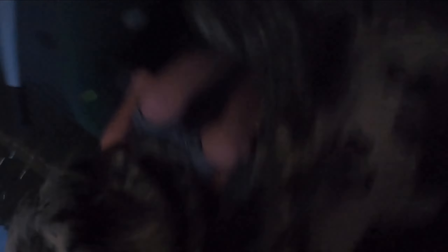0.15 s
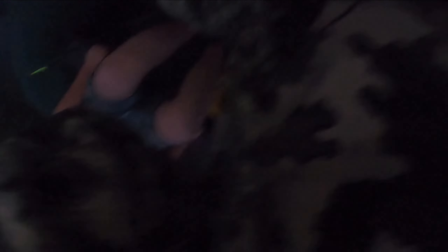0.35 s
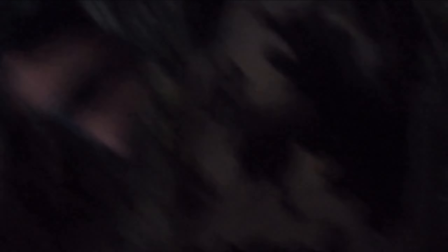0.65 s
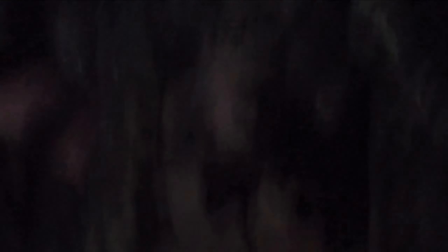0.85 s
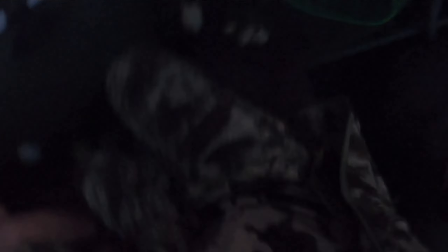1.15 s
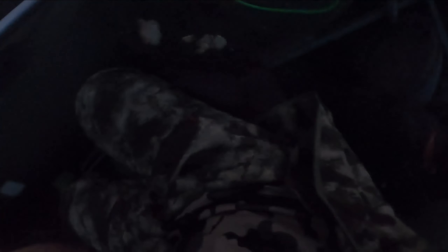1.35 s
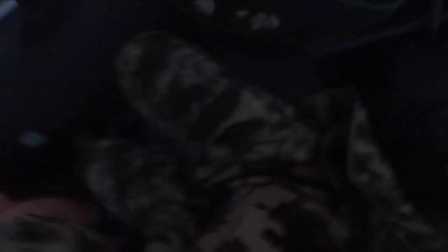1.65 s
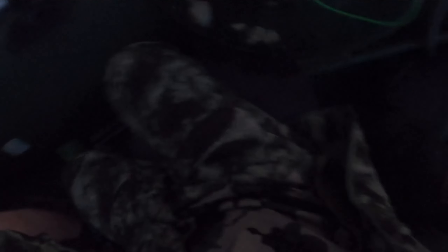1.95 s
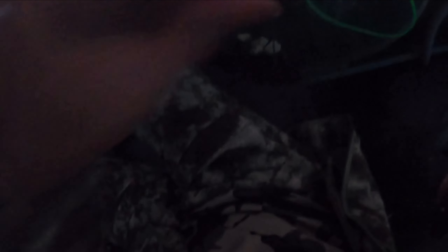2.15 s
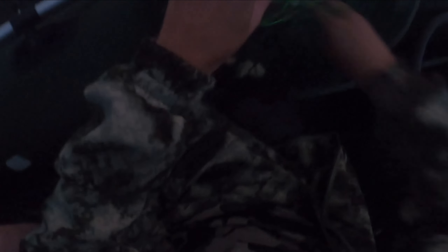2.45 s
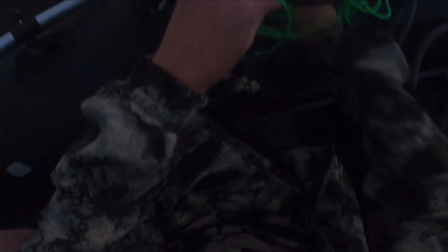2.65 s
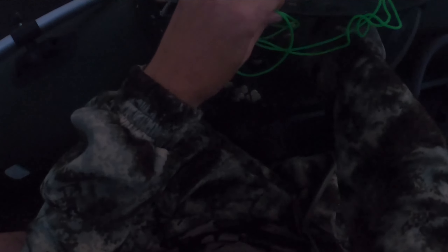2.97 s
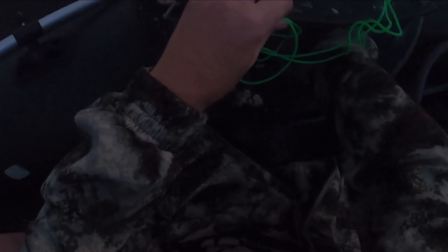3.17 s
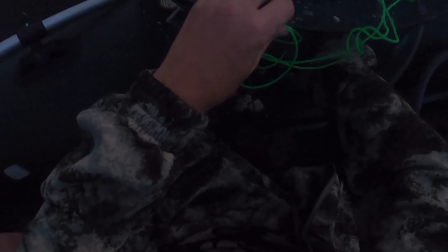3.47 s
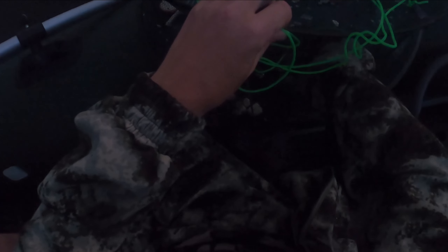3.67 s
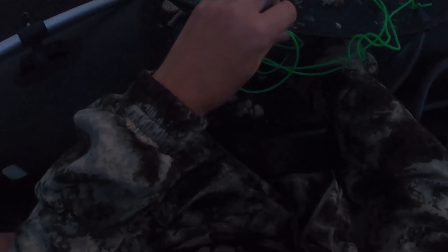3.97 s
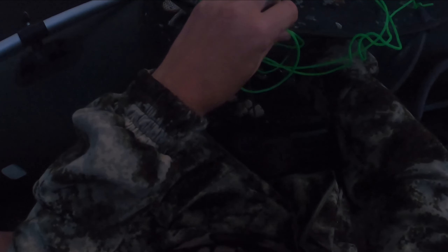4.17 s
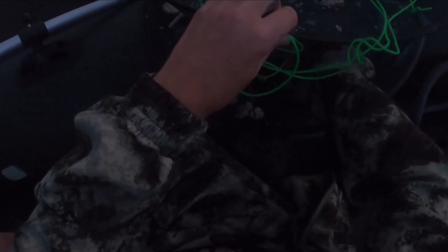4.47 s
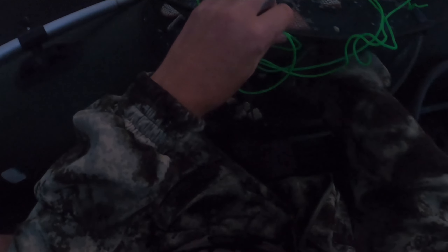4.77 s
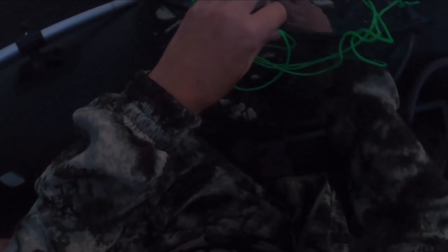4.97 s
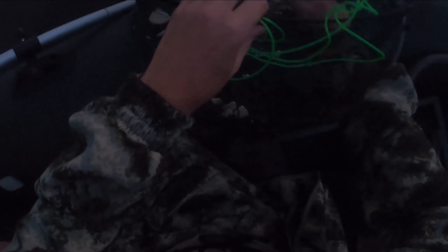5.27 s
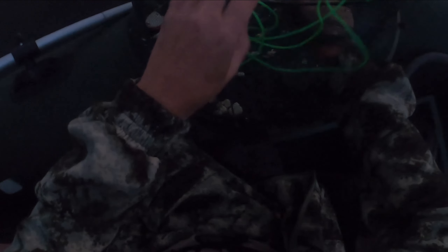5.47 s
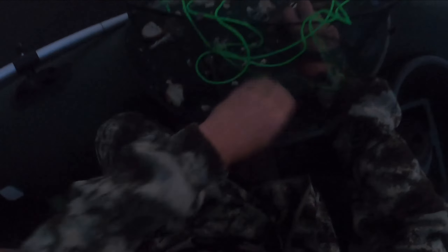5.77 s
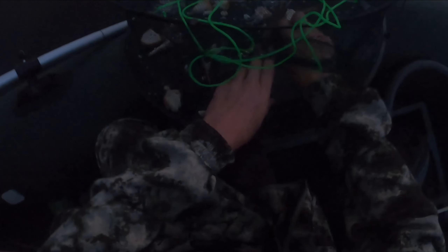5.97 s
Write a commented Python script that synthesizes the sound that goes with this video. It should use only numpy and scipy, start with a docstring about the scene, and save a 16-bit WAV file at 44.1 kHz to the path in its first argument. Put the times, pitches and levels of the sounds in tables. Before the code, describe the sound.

Water plinks and trickles off a wet trap as it bumps a small boat, with one loud thump and soft clothing rustle.

```python
"""A small boat on a still lake: a wet trap comes over the side, close to a worn camera.
The trap knocks and rubs on the hull, and the hardest knock rocks the camera and pings its case.
Drops plink into the lake as ringing air bubbles, the wet mesh ticks, and run-off trickles and fizzes.
A jacket slides with a grainy hiss and body movements shake the microphone, over a hush of open air."""
import sys
import numpy as np
from scipy import signal
from scipy.fft import rfft, irfft
from scipy.io import wavfile
from scipy.ndimage import uniform_filter1d

SR = 44100
rng = np.random.default_rng(int(sys.argv[2]) if len(sys.argv) > 2 else 0)


def bounce(signal):
    """Save signal as a 16-bit WAV file at the path given by the first command-line argument."""
    frames = np.transpose(np.atleast_2d(signal))
    limited = np.clip(frames, -1, 1)
    pcm = np.round(limited * 32767).astype(np.int16)
    wavfile.write(sys.argv[1], SR, pcm)


N = 269753

# Knocks on the hull: start_s, thud_peak_db, spot_pitch_hz, ring_time_ratio, crack_over_thud_db
KNOCKS = [(.052,-36,295,2.45,-22), (.116,-48,161,0.81,13.5), (0.195,-41,283,1.32,-11.5),
          (0.268,-38,227,1.25,-13), (0.603,-47,198,0.59,6), (.625,-35.5,404,1.55,-11),
          (0.6745,-40,200,0.5,6), (.6803,-29,260,.4,-25), (0.717,-47,207,.55,8), (0.8185,-17.5,200,.5,-20),
          (0.8236,-0.3,200,0.6,-23), (.8262,-14,320,1.7,-22), (.933,-35,219,1.28,-13),
          (1.193,-20,230.6,1.1,-11), (1.2028,-25,290,0.6,-16.5), (1.863,-35,239.3,1.48,-15.5),
          (1.898,-35.5,255.3,0.45,-6), (2.047,-42,207,2.27,2), (2.306,-45,300,0.6,4), (2.319,-50,300,.6,7),
          (2.501,-48,330,1.5,7), (2.827,-43.5,230,1.51,4), (2.973,-42,330,1.2,-1),
          (3.194,-43,202.5,2.2,-14), (3.897,-41.5,167,0.415,-4.5), (4.411,-39.5,367,0.78,-1.5),
          (4.8468,-26,375,0.75,-8), (4.881,-36,300,0.44,-13), (4.912,-31,376,0.8,-8),
          (4.928,-31.5,343,0.5,-9), (5.148,-41,306,2.55,7), (5.222,-42,190,1.5,-3),
          (5.281,-29.5,340,0.7,-5), (5.487,-47,263,1.18,5.5), (5.876,-43,215,1.54,-0.5)]
# Resonances of the hull: pitch_hz, level_db, t60_s
HULL_MODES = [(101.9, 3.5, 0.21), (159, 1, 0.1), (188.6, 2.5, 0.084), (227.44, 2.5, 0.0681),
              (306.4, 9.5, 0.047), (353, 0, 0.031), (398, 5.5, 0.056), (495.3, 8, 0.027)]
# Noise bands in the crack of a knock: centre_hz, width_hz, level_db
CRACK_BANDS = [(900, 500, 8), (1450, 700, 10), (2040, 480, 5), (2772, 1000, -2), (3910, 600, -10),
               (6050, 2800, -22.5)]
# The hardest knock rocks the camera: start_s, level_db, pitch_hz, t60_s
CAMERA_WOBBLE = [(.829, -14, 29., .16), (.827, -12, 48, 0.12)]
# The same knock pings the camera case: start_s, peak_db, pitch_hz
CASE_PINGS = [(.8242, -20.5, 770), (.824, -29, 1180), (.823, -24.5, 2070), (.8246, -22, 3000),
              (.8248, -15.5, 3650), (.8248, -28, 4600), (.8252, -21, 6300), (.825, -23.5, 8530),
              (.8258, -37, 12300)]
# Drops landing in the lake: start_s, peak_db, pitch_hz, t60_s, pitch_rise_ratio
DROP_PLINKS = [(0.052,-46,3416,0.0154,0.214), (0.0645,-46.5,1627,0.028,0.016), (0.143,-33,2110,0.0294,0.78),
               (0.168,-39.5,2470,0.0367,0.42), (.17,-47,1259,0.041,0.11), (0.205,-49,1109,0.037,0.049),
               (0.264,-42,1559,0.063,0), (.388,-40.5,1097,0.081,0.037), (0.42,-46,1780,0.019,0.88),
               (0.4321,-42,2314,0.0276,0), (0.869,-45.5,1453,0.07,0.75), (1.4553,-42.5,1681,0.0265,0.13),
               (1.5406,-37.5,1403,0.067,0), (1.7071,-40,1627,0.0106,0.22), (2.7499,-46.5,1295,0.0354,0.43),
               (3.023,-50.5,913,0.069,0.061), (3.055,-47,1158,0.054,0.09), (3.075,-47,1658,0.029,0.095),
               (3.1735,-46,1611,0.035,0), (3.274,-42,1550,0.024,0.26), (3.3391,-39.5,1419,0.087,0.087),
               (3.3634,-42.5,1193,0.122,0.126), (3.462,-33.5,1425,0.027,0.043), (3.482,-46,1521,0.023,0),
               (3.501,-49,1284,0.063,0.061), (3.5237,-33,1400,0.046,0.096), (3.7243,-47,1463,0.057,0.075),
               (3.7563,-45,1545,0.071,0.15), (3.794,-46.5,1547,0.046,0.23), (3.8198,-46,1686,0.0305,0.08),
               (3.8392,-48.5,1536,0.042,.1), (3.972,-47.5,1533,0.032,0.056), (4.018,-47,1625,0.038,0.062),
               (4.0494,-43,1700,0.025,0.096), (4.0914,-48.5,1690,0.041,0.11), (4.116,-49.5,1390,0.094,0.03),
               (4.139,-33.5,1422,0.0387,0.0045), (4.1774,-40,1584,0.031,0.42),
               (4.2296,-48.5,1586,0.042,0.11), (4.303,-43,2194,0.058,0.59), (4.365,-41.5,2384,0.035,0.83),
               (4.3796,-32,1694,0.043,0.068), (4.474,-39,1490,0.051,0), (4.57,-39,1661,0.059,0.059),
               (4.6231,-46,1411,0.068,0.084), (4.6427,-42.5,1681,0.039,0.05), (4.684,-49,1750,0.079,0.27),
               (4.782,-38,2056,0.0388,0.74), (5.0767,-44.5,1703,0.042,0), (5.3947,-50.5,1600,0.061,0.16),
               (5.8521,-44.5,1410,0.062,0.204)]
# Ticks of wet mesh and cord, plus the bright edge of the knock at 0.116 s: start_s, peak_db, pitch_hz
MESH_TICKS = [(.116, -45, 5600), (.7632, -48, 7600), (0.784, -34, 4520), (1.541, -50, 7000),
              (2.097, -48, 8800), (2.6858, -46, 4390), (2.736, -51.5, 9630), (2.789, -41.5, 4900),
              (2.975, -41, 5640), (2.996, -45.5, 4960), (3.255, -44.5, 5900), (3.7941, -49, 4940),
              (3.862, -53, 8460), (3.895, -51.5, 5490), (4.085, -51.5, 5010), (4.14, -46, 5400),
              (4.14, -50, 8460), (4.1776, -45, 4810), (4.345, -48, 7700), (4.384, -41.5, 5080),
              (4.4108, -35.5, 7570), (4.777, -46, 8030), (4.862, -46.5, 5040), (4.8796, -40.5, 3406),
              (4.9344, -50.5, 7880), (5.023, -44, 5020), (5.101, -44.5, 6270), (5.1685, -45, 5020),
              (5.282, -45.5, 7530), (5.321, -35, 5120), (5.462, -48.5, 2605), (5.5148, -47, 5040),
              (5.6213, -45.5, 8320), (6.0086, -44, 3280)]
# Jacket slides: peak_s, hiss_db, rise_20db_s, hold_s, fall_20db_s, rasp_over_hiss_db, rasp_hz
JACKET_SLIDES = [(.95, -53.5, 0.5325, .25, 0.3953, -9, 2630), (1.299, -47, .5, 0.0745, 0.0659, -9, 2750),
                 (1.699, -47, 0.24, 0.093, 0.1916, -8.5, 2630),
                 (2.04, -52.5, 0.2172, 0.0315, 0.1444, -10, 4000), (2.063, -64, .03, .012, .03, 11, 3300),
                 (2.13, -60, 0.12, 0.102, 0.1958, -1, 2520), (2.16, -69, .15, .07, .12, 6, 4200)]
# Tone of the sliding cloth: frequency_hz, level_db
CLOTH_SPECTRUM = [(290, -16.5), (500, -0.5), (640, -7), (761, -2), (933, -1), (1110, 1.5), (1420, -2.5),
                  (2230, -6), (2570, 1), (3290, -3), (7100, -8), (9090, -16.5), (12700, -23.5),
                  (16000, -36)]
# Body movements that shake the camera: peak_s, rumble_db, fade_20db_s
BODY_JOLTS = [(.15, -49.5, 0.11), (.62, -62, 0.16), (.97, -46.5, 0.3651), (1.32, -45, 0.3366),
              (1.75, -33, 0.0885), (1.9, -43, 0.0631), (2.08, -59.5, 0.53), (2.22, -42, 0.047),
              (2.32, -36, .11), (3.82, -56, 0.0951), (4.75, -61, 0.15), (4.95, -65, .4)]
# Cord and trap rubbing on the hull: peak_s, level_db, fade_20db_s
HULL_RUBS = [(.06, -49.5, 0.08), (.27, -55.5, 0.5), (.68, -51, .5), (.95, -50.5, 0.63), (1.3, -46.5, 0.17),
             (1.75, -42, 0.1637), (1.88, -49, 0.12), (2.07, -52, 0.19), (2.35, -54.5, 0.5),
             (2.82, -58.5, 0.54), (3.22, -53.5, 0.2349), (4.43, -54, 0.2), (3.85, -60, 0.23),
             (4.77, -51, 0.08), (4.92, -54, 0.58), (5.17, -51, 0.11), (5.24, -47.5, 0.0943),
             (5.5, -50.5, 0.04), (6.08, -58.5, 0.66)]
# Water running off the trap: time_s, trickle_db, spray_db
RUNOFF_LEVELS = [(0, -65.5, -74), (.25, -60.5, -77), (.6, -60, -60), (1., -60.5, -66), (1.46, -68, -82.5),
                 (1.8, -60.5, -66), (2.2, -66, -67), (2.6, -71, -71), (3.05, -60, -63.5), (3.3, -62, -61),
                 (3.8, -66, -77), (4.1, -62.5, -79), (4.4, -66, -58), (4.65, -64, -72.5),
                 (4.95, -69.5, -59.5), (5.2, -59, -62.5), (5.5, -68, -71.5), (5.9, -59, -61),
                 (6.12, -62.5, -56.5)]
# Crinkling fibres of cord and cloth: peak_s, level_db, half_length_s
FIBRE_CRINKLES = [(1.231, -60, .003), (5.061, -71.5, 0.0074), (5.101, -64.5, .003), (5.164, -69.5, 0.0052),
                  (5.282, -70, .003), (5.32, -71, 0.0214), (5.366, -68.5, 0.0075), (6.091, -68, 0.023)]
# Tone of the background hush: frequency_hz, level_db
AIR_SPECTRUM = [(12, -37), (20, -30.5), (93, -16), (187, 3), (718, -15.5), (923, -18), (1290, -8.5),
                (1570, -13.5), (2820, -15), (7950, -22), (10500, -34.5), (14300, -39), (16000, -66)]


def hull_knocks():
    """Each knock rings the hull modes near the pitch of the struck spot, with a short crack on top."""
    out = np.zeros(N)
    t = np.arange(SR // 4) / SR
    build_cycles = .7  # the hull first gives way, then swings back harder
    snap = t / .0006 * np.exp(-t / .00038)
    rattle = .045 * np.exp(-t / .012)
    for start_s, db, spot_hz, ring_ratio, crack_db in KNOCKS:
        thud = 0
        for hz, mode_db, t60 in HULL_MODES:
            off_spot_db = -45 * np.log2(hz / spot_hz) ** 2
            decay = 1000. ** (-t / (t60 * ring_ratio))
            thud = thud + undb(mode_db + off_spot_db) * np.sin(2 * np.pi * hz * t) * decay
        thud *= -np.minimum(t * spot_hz / build_cycles, 1) ** 2
        burst = rng.standard_normal(len(t)) * (snap + rattle)
        crack = sum(undb(band_db) * band(burst, hz - width / 2, hz + width / 2)
                    for hz, width, band_db in CRACK_BANDS)
        add(out, start_s, undb(db) * (unit_peak(thud) + undb(crack_db) * unit_peak(crack)))
    return out


def camera_wobble():
    """The camera rocks under the hardest knock: a sub-bass thump."""
    out = np.zeros(N)
    for start_s, db, hz, t60 in CAMERA_WOBBLE:
        add(out, start_s, -undb(db) * ping(hz, t60, rise=0, attack_s=.004))
    return out


def ticks(rows):
    """Mesh, cord or camera case ticks: a brief ring and a puff of noise around the same pitch."""
    out = np.zeros(N)
    t = np.arange(400) / SR
    ring_cycles, puff_s = 28.55, .0007
    for start_s, db, hz in rows:
        ring = ping(hz, t60=min(ring_cycles / hz, .018), rise=.06, attack_s=2.2 / hz)
        puff = rng.standard_normal(len(t)) * t / puff_s * np.exp(-t / puff_s)
        edges_hz = .587 * hz, min(1.454 * hz, .45 * SR)
        add(out, start_s, undb(db) * unit_peak(ring))
        add(out, start_s, undb(db + 5) * band(band(puff, *edges_hz), *edges_hz))
    return out


def drops():
    """Each drop splashes and traps a bubble whose pitch climbs as it nears the surface."""
    out = np.zeros(N)
    t = np.arange(600) / SR
    for start_s, db, hz, t60, rise in DROP_PLINKS:
        t60 = max(t60 / (1 + rise), .004)  # bubbles that climb fast burst early
        plink = unit_peak(ping(hz, t60, rise, attack_s=.0007))
        splash = rng.standard_normal(len(t)) * np.exp(-t / .0024)
        add(out, start_s, undb(db) * plink)
        add(out, start_s + .0072, undb(db - 12) * plink)  # reflection off the hull side
        add(out, start_s, undb(db - 4) * band(splash, .65 * hz, 2.14 * hz))
    return out


def jacket():
    """Cloth slides as a grainy hiss, with a narrow rasp where it catches."""
    grain = undb(1.8 * flutter(300) + .6 * flutter(40))
    hiss = colour(rng.standard_normal(N) * grain, CLOTH_SPECTRUM)
    catches = rng.standard_normal(N) * grain
    hiss_power = rasp = 0
    for *shape, rasp_db, rasp_hz in JACKET_SLIDES:
        slide = swell(*shape)
        hiss_power += slide ** 2
        rasp += slide * undb(rasp_db) * unit_rms(band(catches, .91 * rasp_hz, 1.09 * rasp_hz))
    return np.sqrt(hiss_power) * hiss + rasp


def body_rumble():
    """Body movements reach the microphone as an uneven low rumble."""
    sub = band(rng.standard_normal(N), 8.5, 55)
    bass = .22 * band(rng.standard_normal(N), 80, 162)
    rumble = unit_rms((sub + bass) * undb(1.8 * flutter(21)))
    return (swells(BODY_JOLTS) + undb(-85)) * rumble  # the camera is never quite still


def hull_rubs():
    """The hull grumbles as cord and trap drag over it."""
    grumble = band(rng.standard_normal(N), 140, 400) * undb(4.5 * flutter(45))
    return swells(HULL_RUBS) * unit_rms(grumble)


def runoff():
    """Water leaves the mesh as a trickle, a fizz of fine spray and a spatter of stray droplets."""
    t = np.arange(N) / SR
    times_s, *levels_db = np.transpose(RUNOFF_LEVELS)
    trickle_gain, spray_gain = (undb(np.interp(t, times_s, db)) for db in levels_db)
    trickle = bubbles(count=1500, centre_hz=1607.7, spread_octaves=.59, cycles=26, rise=.11, skew_db=2.5)
    fizz = bubbles(count=6000, centre_hz=3925, spread_octaves=1.2, cycles=22, rise=.37, skew_db=2.5)
    spatter = bubbles(count=250, centre_hz=3300, spread_octaves=.7, cycles=12, rise=.5, skew_db=3)
    return trickle_gain * (trickle + undb(-12.5) * spatter) + spray_gain * fizz


def bubbles(count, centre_hz, spread_octaves, cycles, rise, skew_db):
    """Small air bubbles ring at random moments, most of them soft and a few loud."""
    out = np.zeros(N)
    for when, tune, softness in rng.random((count, 3)):
        hz = centre_hz * 2 ** (spread_octaves * (2 * tune - 1))
        db = -skew_db * np.log(max(softness, .01))
        add(out, when * N / SR, undb(db) * ping(hz, cycles / hz, rise, attack_s=.00022))
    return unit_rms(out)


def crinkles():
    """Fibres of cord and cloth crinkle in tiny swells of high crackle."""
    t = np.arange(N) / SR
    gain = sum(undb(db) * np.exp(-((t - peak_s) / half_s) ** 2) for peak_s, db, half_s in FIBRE_CRINKLES)
    crackle = rng.standard_normal(N) * undb(3 * flutter(500))
    return gain * unit_rms(band(band(crackle, 9660, 14200), 9660, 14200))


def lake_air():
    """A bed of open air and microphone hush, drifting slightly in level."""
    drift_db = 1.3 * flutter(6)
    return undb(-59.5 + drift_db) * colour(rng.standard_normal(N), AIR_SPECTRUM)


def ping(hz, t60, rise, attack_s):
    """A dying sine that glides up through hz by rise * hz in all, then levels off."""
    t = np.arange(int(t60 * SR) + 8) / SR
    pitch_hz = np.minimum(hz * (1 + rise * (np.tanh(t / .007) - .4)), .45 * SR)
    envelope = (1 - np.exp(-t / attack_s)) * 1000. ** (-t / t60)
    return np.sin(2 * np.pi * np.cumsum(pitch_hz) / SR) * envelope


def swell(peak_s, db, rise_s, hold_s, fall_s):
    """A fader move: up 20 dB per rise_s, hold, then down 20 dB per fall_s."""
    t = np.arange(N) / SR - peak_s
    return undb(db - 20 * np.maximum(np.maximum(-t / rise_s, (t - hold_s) / fall_s), 0))


def swells(rows):
    """Symmetric swells with no hold; their powers add."""
    return np.sqrt(sum(swell(peak_s, db, fade_s, 0, fade_s) ** 2 for peak_s, db, fade_s in rows))


def flutter(rate_hz):
    """Smoothed random steps at unit RMS."""
    hold = int(SR / rate_hz)
    steps = np.repeat(rng.standard_normal(N // hold + 1), hold)
    return unit_rms(uniform_filter1d(uniform_filter1d(steps, hold), hold)[:N])


def colour(x, spectrum):
    """EQ through the spectrum's points on a log frequency axis, at unit RMS."""
    hz, db = np.transpose(spectrum)
    bins_hz = np.arange(N // 2 + 1) * SR / N + 1
    gain = undb(np.interp(np.log(bins_hz), np.log(hz), db))
    return unit_rms(irfft(rfft(x) * gain, N))


def band(x, lo_hz, hi_hz):
    return signal.sosfilt(signal.butter(2, [lo_hz, hi_hz], "bandpass", fs=SR, output="sos"), x)


def add(out, start_s, x):
    i = int(start_s * SR)
    out[i:i + len(x)] += x[:max(N - i, 0)]


def undb(db):
    return 10 ** (np.asarray(db) / 20)


def unit_rms(x):
    return x / np.sqrt(np.mean(x ** 2))


def unit_peak(x):
    return x / np.abs(x).max()


def scene():
    """Mono mix of the hits and the textures beneath them."""
    hits = drops() + ticks(CASE_PINGS) + ticks(MESH_TICKS) + hull_knocks() + camera_wobble()
    textures = jacket() + body_rumble() + hull_rubs() + runoff() + lake_air() + crinkles()
    return (hits + textures)[None]


def record(dry):
    """The camera soft-clips the loudest peak and cuts the top end."""
    top_hz = 15700
    rounded = .97 * np.tanh(np.abs(dry) ** 4) ** .25 * np.sign(dry)
    return signal.sosfilt(signal.ellip(8, .2, 70, top_hz, fs=SR, output="sos"), rounded)


dry = scene()
out = record(dry)
bounce(out)
```